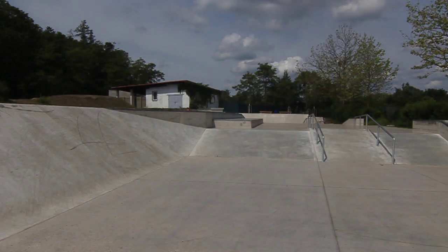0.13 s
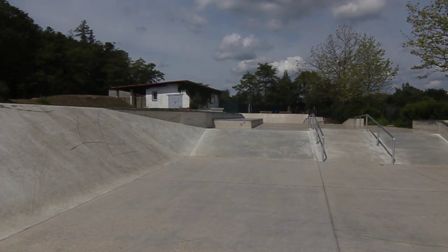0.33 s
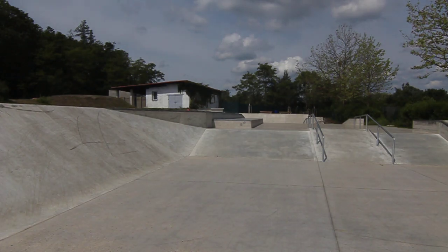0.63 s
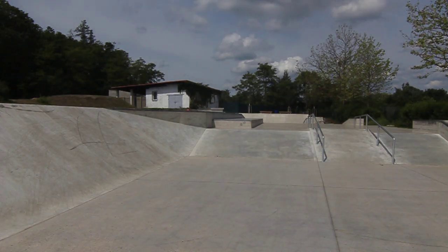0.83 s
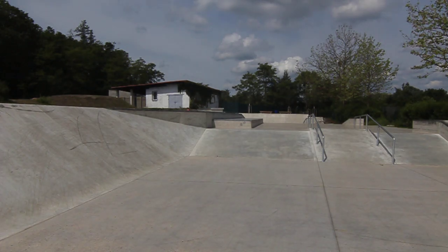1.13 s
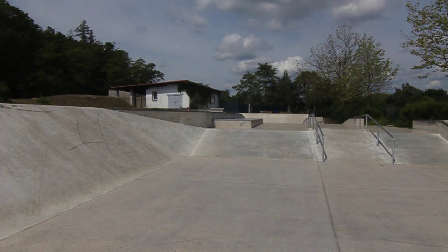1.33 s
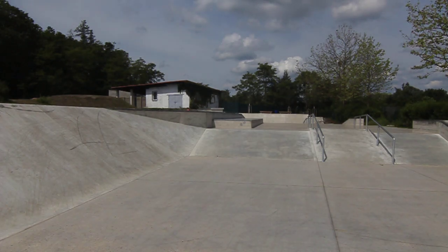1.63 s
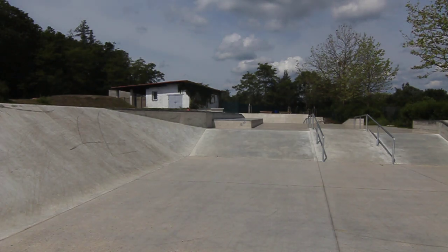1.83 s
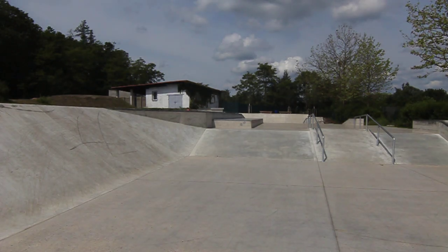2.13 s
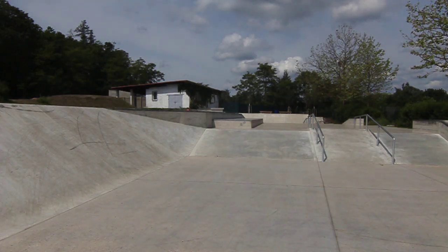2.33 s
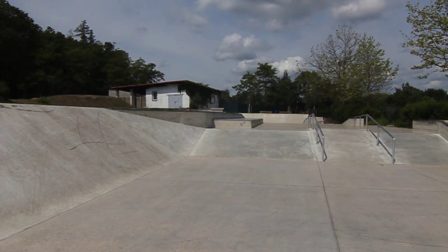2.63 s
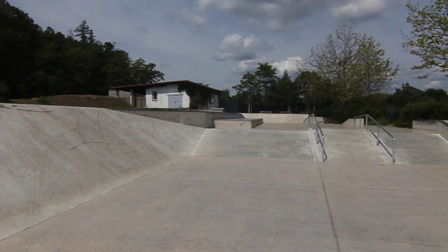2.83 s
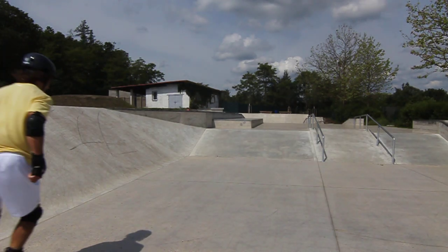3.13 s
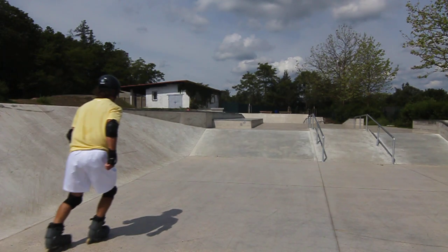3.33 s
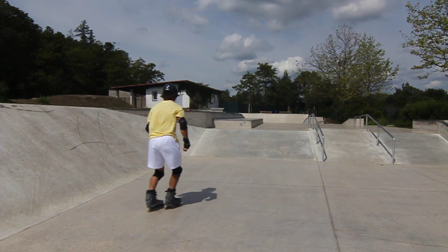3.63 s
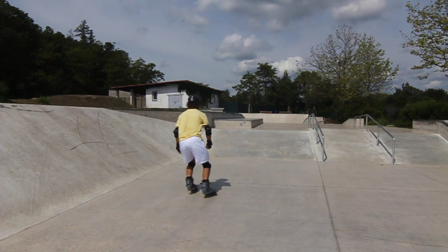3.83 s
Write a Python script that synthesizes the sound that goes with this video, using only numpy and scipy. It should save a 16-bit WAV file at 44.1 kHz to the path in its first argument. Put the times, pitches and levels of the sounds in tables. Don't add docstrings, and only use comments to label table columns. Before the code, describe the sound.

Inline skate wheels, quiet at first, hum and grind louder over open concrete, with hollow slaps, a gritty push-off scrape and plastic creaks, passing closest after three seconds near a still microphone in light wind.

```python
import sys
import numpy as np
from scipy import signal
from scipy.fft import rfft, irfft
from scipy.io import wavfile

SR = 44100
rng = np.random.default_rng(int(sys.argv[2]) if len(sys.argv) > 2 else 0)


def level_to_linear(level):
    exponent = np.asarray(level, float) / 20
    return 10 ** exponent


def wrap_up_sound(samples):
    columns = np.atleast_2d(samples).T
    tamed = np.clip(columns, -1, 1)
    steps = np.round(tamed * 32767).astype(np.int16)
    wavfile.write(sys.argv[1], SR, steps)


N = 176400
T = np.arange(N) / SR

# time in seconds, level in dB.
RUSTLE = [(0, -53.5), (.28, -59), (.45, -68), (1.2, -69), (2.0, -70), (2.9, -54), (3.15, -45), (3.4, -51.5),
          (3.56, -55.5), (4, -53)]
# frequency in Hz, level in dB per Hz.
RUSTLE_COLOUR = [(4000, -24), (7000, 0), (12000, 1.5), (16000, -3.5)]
# start in seconds, peak in dB.
RUSTLE_TICKS = [
    (.449, -36),
    (.499, -40),
    (.568, -40),
    (0.788, -40.5),
    (1.102, -46),
    (1.247, -44),
]
# time in seconds, level in dB.
WIND = [(0.0, -59.5), (2.04, -55), (4.0, -54)]
# frequency in Hz, level in dB per Hz.
WIND_COLOUR = [(15, -31), (30, -8), (50, -4), (90, 0), (200, -4), (400, -32.5)]
# centre in seconds, peak in dB, pitch in Hz, width in seconds.
GUSTS = [
    (.678, -33, 75, .010),
    (.694, -26, 95, .007),
    (1.09, -39, 80, .010),
    (2.93, -36, 60, .012),
]
# start in seconds, length in seconds, level in dB, pitch in Hz, glide in Hz.
CHIRPS = [
    (.016, 0.0024, -41, 3780, 50),
    (.088, 0.014, -39.5, 3700, 82),
    (.104, 0.024, -38.5, 3740, 150),
    (.885, .009, -46, 2650, 0),
    (1.214, 0.029, -60, 4640, -40),
    (2.072, 0.0084, -34, 3640, 0),
]

# start in seconds, peak in dB.
CREAKS = [(2.9124, -24), (2.9203, -22), (2.9275, -19.5), (2.9354, -18), (2.939, -25), (2.9453, -24),
          (2.9528, -18), (2.959, -25), (2.9668, -23), (2.9735, -23), (2.9852, -18), (2.9946, -18),
          (3.0112, -28), (3.0172, -21), (3.0298, -21), (3.0396, -16.5), (3.0546, -18), (3.0617, -20),
          (3.0834, -25), (3.1146, -19)]
# start in seconds, peak in dB.
LATE_CREAKS = [
    (3.369, -26.5),
    (3.3863, -23),
    (3.484, -29),
    (3.676, -34),
    (3.6959, -21),
    (3.7106, -22.5),
    (3.8081, -31),
    (3.9749, -22),
]
# start in seconds, gap between ticks in seconds, peak in dB.
CREAK_RUNS = [
    (3.598, .009, -36),
    (3.725, .0085, -31),
    (1.853, .0105, -37),
]
CREAK_COUNTS = (5, 5, 21)
# frequency in Hz, level in dB, time to fall 60 dB in seconds.
SHELL = [(2040, -1.5, 0.0044), (2400, 2, 0.0056), (2850, 2.5, 0.0032), (4570, 1, 0.002), (5800, 7, 0.0024),
         (7600, 1, 0.0032), (9000, 0.5, 0.0024), (12300, 0, 0.00095)]
# start in seconds, peak in dB.
RATTLES = [(1.3608, -31), (1.365, -42), (1.3838, -29), (2.172, -29), (2.3215, -38), (2.3265, -23),
           (2.3368, -24), (2.3565, -24), (2.3755, -26), (2.397, -23), (2.4005, -31), (2.4155, -22.5),
           (2.4215, -29), (2.432, -28), (2.450, -32), (2.466, -28), (3.4255, -24.5), (3.4392, -19.5),
           (3.448, -24), (3.457, -30)]
# frequency in Hz, level in dB, time to fall 60 dB in seconds.
BUCKLE = [(2310, -2, 0.0044), (3220, -1.5, 0.0051), (4840, 9.5, 0.0046), (5480, 9, 0.0021),
          (7000, 1, 0.002), (9070, -9, 0.0088), (13000, -6.5, 0.0013)]
# start in seconds, peak in dB.
SNAPS = [
    (2.481, -33),
    (3.2359, -5.5),
    (3.506, -32),
    (3.765, -30),
    (3.802, -30),
]

# time in seconds, level in dB, lower edge in Hz.
SLIDE = [(3.79, -45, 12000), (3.83, -36, 10400), (3.87, -31, 7600), (3.92, -32, 6760), (3.945, -36, 8400),
         (4.0, -47, 9000)]
# start in seconds, length in seconds, level in dB, pitch in Hz, glide in Hz.
SQUEALS = [
    (3.89, 0.023, -40, 5700, -200),
    (3.935, 0.026, -41.5, 5800, -400),
    (3.972, 0.016, -34.5, 5470, 400),
]
# time in seconds, level in dB.
SCRAPE = [(2.6, -53), (2.63, -39), (2.655, -43), (2.70, -32.5), (2.74, -37), (2.76, -35), (2.776, -33),
          (2.81, -41), (2.826, -40), (2.843, -29)]
# start in seconds, dB in the low cores, dB in the high cores.
SLIPS = [(2.6225, -25, -28), (2.634, -26, -32), (2.646, -38, -27), (2.661, -28, -24), (2.669, -29, -27),
         (2.676, -27, -20.5), (2.687, -27, -20), (2.695, -28, -19.5), (2.702, -23, -22), (2.7083, -22, -19),
         (2.72, -35, -22), (2.732, -19.5, -19), (2.738, -24.5, -23), (2.749, -30, -27), (2.767, -30, -26),
         (2.775, -23, -22.5), (2.8277, -32, -29), (2.843, -19.5, -14.5)]
# frequency in Hz, width in Hz, level in dB.
WHEEL_CORES = [(1770, 1200, 9.5), (2180, 480, 5.5), (4730, 990, 6.5), (7670, 1900, -3.5)]

# time in seconds, hum of the wheels in dB, grind under load in dB.
ROLL = [(0, -57, -59.5), (.6, -52, -59.5), (1.3, -50, -56), (1.5, -47.5, -47.5), (1.6, -47.5, -60),
        (1.82, -47.5, -53.5), (1.9, -45, -46.5), (2.4, -43.5, -43), (2.57, -43.5, -47.5), (3.0, -44, -43),
        (3.28, -41.5, -43), (3.36, -47, -51.5), (4, -45, -46)]
# frequency in Hz, level in dB per Hz.
HUM_COLOUR = [(88, -49), (150, -17), (230, 0), (728, -1.5), (1100, 4.5), (1890, -14), (3000, -14),
              (3900, -18), (6600, -120)]
# frequency in Hz, level in dB per Hz.
GRIND_COLOUR = [(900, -8), (1600, 6), (2900, -1), (4800, -2), (6300, -6), (9000, -17), (16000, -28)]

# start in seconds, thump in dB, thump in Hz, clatter in dB, clatter in seconds.
LANDINGS = [(0.931, -42, 590, -39, 0.0064), (1.103, -33, 677, -49, 0.023), (1.397, -16, 360, -15.5, 0.0092),
            (1.598, -38, 313, -32.5, 0.0015), (2.132, -20, 295, -26.5, 0.055),
            (2.183, -5, 210, -12.5, 0.0033), (2.262, -15, 151, -18.5, 0.01),
            (2.277, -19.5, 192, -26.5, 0.011), (2.787, -17, 160, -21.5, 0.012),
            (2.8432, -18, 255, -13, 0.0042), (3.18, -27, 330, -13.5, 0.0051),
            (3.219, -4.5, 197, -15.5, 0.0064), (3.2769, -10, 207, -15, 0.009),
            (3.325, -32.5, 226, -59, 0.0068)]
# frequency in Hz, level in dB per Hz.
CLATTER_COLOUR = [(70, -35), (240, 8.5), (400, 8), (1580, 3.5), (6150, -5), (8240, -13), (10700, -14.5),
                  (16000, -15)]
# start in seconds, frequency in Hz, level in dB, 60 dB fall in seconds.
FRAME_KNOCKS = [(.931, 2270, -32.5, 0.011), (1.3985, 315, -14.5, 0.053), (1.419, 320, -23, .04),
                (2.133, 1273, -18.5, 0.037), (2.149, 1860, -28.5, 0.054), (2.186, 205, -19, 0.14),
                (2.183, 742, -14.5, 0.035), (2.184, 1130, -22.5, 0.029), (2.198, 412, -19, 0.06),
                (2.2635, 780, -16.5, 0.049), (2.2632, 360, -23.5, 0.08), (2.265, 1650, -30, 0.026),
                (2.28, 1140, -29, .03), (2.667, 170, -28.5, .07), (2.845, 388, -25, 0.038),
                (3.2195, 374, -19, .04), (3.277, 410, -13, 0.03), (2.7746, 1830, -19, 0.018),
                (2.789, 1118, -24.5, 0.089), (2.8445, 3700, -15.5, 0.0075)]
# start in seconds, level in dB.
BOUNCES = [
    (1.4095, -26),
    (1.4155, -18),
    (1.4235, -27),
    (1.4305, -29),
    (1.4465, -23),
]
# frequency in Hz, level in dB, time to fall 60 dB in seconds.
LOOSE_WHEEL = [(1940, -7, .005), (2800, 6, 0.0044), (4140, 7, 0.0024), (5800, 4, 0.0033)]
# start in seconds, level in dB.
PINGS = [
    (3.2203, -14),
    (3.2263, -15),
    (3.281, -18),
]


def rms_one(x):
    return x / np.sqrt(np.mean(x ** 2) + 1e-20)


def noise():
    return rng.standard_normal(N)


def in_time(rows):
    s, *columns = np.transpose(rows)
    return [np.interp(T, s, c) for c in columns]


def drift(rate):
    r = np.exp(-80 * np.pi * rate / SR)
    slow = signal.lfilter([1], [1, -2 * r, r * r], rng.standard_normal(N // 40 + 2002))[2000:]
    return np.interp(np.arange(N) / 40, np.arange(len(slow)), rms_one(slow))


def colour(x, spectrum):
    hz, db = np.transpose(spectrum)
    f = np.maximum(np.fft.rfftfreq(N, 1 / SR), 1)
    gain = level_to_linear(np.interp(np.log(f), np.log(hz), db))
    return rms_one(irfft(rfft(x) * gain, N))


def high_pass(x, hz):
    return signal.lfilter(*signal.butter(2, hz, "high", fs=SR), x)


def band_pass(x, low_hz, high_hz):
    return signal.sosfilt(signal.butter(2, [low_hz, high_hz], "band", fs=SR, output="sos"), x)


def click_at(s, db):
    return level_to_linear(db) * (np.arange(N) == int(s * SR))


def ring(clicks, hz, t60):
    r, w = level_to_linear(-60 / (t60 * SR)), 2 * np.pi * hz / SR
    return signal.lfilter([0, np.sin(w)], [1, -2 * r * np.cos(w), r * r], clicks + 1e-18)


def grains(rate, spread_db):
    sizes = level_to_linear(spread_db * np.minimum(rng.exponential(1, N), 5)) * rng.choice([-1, 1], N)
    return sizes * (rng.random(N) < rate / SR)


def after(s, t60, rise_s):
    out = np.zeros(N)
    active = (T > s) & (T < s + t60)
    age = T[active] - s
    out[active] = (1 - np.exp(-age / rise_s)) * level_to_linear(-60 * age / t60)
    return out


def ticks(rows, modes, blur_s, gain_db):
    s, db = np.transpose(rows)
    chance = rng.normal(0, 1.2, (len(s), len(modes)))
    roughness = np.sign(noise()) if blur_s > 1e-4 else 1
    fade = np.exp(-np.arange(300) / (blur_s * SR))
    fade = fade / np.linalg.norm(fade)
    out = 0
    for k, (hz, level_db, t60) in enumerate(modes):
        clicks = np.zeros(N)
        clicks[(s * SR).astype(int)] = level_to_linear(db + level_db + chance[:, k] + gain_db)
        scratch = np.convolve(clicks, fade)[:N] * roughness
        out = out + (-1) ** k * ring(scratch, hz, t60)
    return out


def runs(rows, counts):
    out = []
    for (s, gap, db), count in zip(rows, counts):
        for k in range(count):
            out.append((s + gap * (k + rng.normal(0, .06)), db))
    return out


def whistles(rows, rough):
    out, wobble = 0, drift(180)
    for s, length, db, hz, glide_hz in rows:
        u = np.clip((T - s) / length, 0, 1)
        turns = length * (hz * u + glide_hz * u * u / 2)
        out = out + level_to_linear(db) * np.sin(np.pi * u) ** 0.25 * np.sin(2 * np.pi * turns + rough * wobble)
    return out


def wind():
    out = colour(noise(), WIND_COLOUR) * level_to_linear(in_time(WIND)[0] + 3 + 2.5 * drift(10))
    for s, db, hz, width in GUSTS:
        out += level_to_linear(db) * np.cos(2 * np.pi * hz * (T - s)) * np.exp(-((T - s) / width) ** 2)
    return out


def rustle():
    comb_hz, comb_feedback, comb_fade_s = 1465, .5, 1.3
    crisp = colour(noise() + .4 * rms_one(grains(600, spread_db=3.0)), RUSTLE_COLOUR)
    comb = np.r_[1, np.zeros(int(SR / comb_hz) - 1), -comb_feedback]
    banded = rms_one(signal.lfilter([1], comb, crisp))
    share = np.exp(-(T / comb_fade_s) ** 2)
    mixed = share * banded * level_to_linear(3.0 * drift(50)) + (1 - share) * crisp
    ticking = sum(level_to_linear(db - 5) * after(s, 0.013, rise_s=0.00046) for s, db in RUSTLE_TICKS)
    return mixed * level_to_linear(in_time(RUSTLE)[0] + .8 * drift(30)) + banded * ticking


def bird():
    return whistles(CHIRPS, rough=0.61)


def boots():
    snap_low_hz, snap_s = 5000, .003
    snaps = sum(level_to_linear(db - 3) * after(s, 4.0 * snap_s, rise_s=.0003) for s, db in SNAPS) * noise()
    creak_rows = list(CREAKS) + list(LATE_CREAKS) + runs(CREAK_RUNS, CREAK_COUNTS)
    creaks = ticks(creak_rows, SHELL, blur_s=.00005, gain_db=-7)
    rattles = ticks(RATTLES, BUCKLE, blur_s=.0018, gain_db=-8)
    return creaks + rattles + high_pass(snaps, snap_low_hz)


def slide():
    db, edge_hz = in_time(SLIDE)
    out, white = 0, rng.standard_normal((2, N))
    for k, hz in enumerate(np.arange(6000, 16000, 1000)):
        band = band_pass(white[k % 2], hz, hz + 1000)
        opening = 1 / (1 + np.exp((edge_hz - hz - 500) / 300))
        out = out + band * level_to_linear(4.1 * drift(34) - 0.88 * k) * opening
    return 1.6 * out * level_to_linear(db) * (T > SLIDE[0][0])


def squeals():
    return whistles(SQUEALS, rough=2.3)


def scrape():
    slips_per_s, slip_t60_s, slip_blur_s = 2500, 0.0043, 0.002
    grit = [rms_one(grains(slips_per_s, spread_db=2.5)) * level_to_linear(2.0 * drift(110)) for _ in range(2)]
    bed = 0
    for k, (hz, width, db) in enumerate(WHEEL_CORES):
        bed = bed + level_to_linear(db) * rms_one(ring(grit[k // 2], hz, 1.35 / width))
    bed = high_pass(bed, 1200)
    inside = (T > SCRAPE[0][0]) & (T < SCRAPE[-1][0])
    bed = bed / np.std(bed[inside]) * level_to_linear(in_time(SCRAPE)[0]) * inside
    cores = [(hz, db, slip_t60_s) for hz, width, db in WHEEL_CORES]
    high_cores = cores[2:] + [(3970, 1.5, 0.0067), (5870, 3.8, 0.0035)]
    low = ticks([(s, db) for s, db, _ in SLIPS], cores[:2], slip_blur_s, gain_db=0.5)
    high = ticks([(s, db) for s, _, db in SLIPS], high_cores, slip_blur_s, gain_db=-7.5)
    return bed + low + high


def rolling():
    core_hz, core_width_hz, core_db, pass_s = 980, 60, -1.5, 3.39
    grit_per_s, grit_spread_db, grit_share = 1500, 3.5, .4
    hum_db, grind_db = in_time(ROLL)
    passed = 1 / (1 + np.exp((pass_s - T) / 0.025))
    core = level_to_linear(core_db) * rms_one(ring(noise(), core_hz, 1.3 / core_width_hz)) * passed
    hum = (colour(noise(), HUM_COLOUR) + core) * level_to_linear(hum_db + 2 + 1.15 * drift(35))
    grit = rms_one(grains(grit_per_s * level_to_linear(3.7 * drift(38)), grit_spread_db))
    grind = colour(noise() + grit_share * grit, GRIND_COLOUR)
    return hum + grind * level_to_linear(grind_db + 2.1 * drift(71))


def landings():
    thump_t60_s, overtone, bass_cut_hz, contact_hz = 0.038, 1.98, 158, 605
    echo_db, echo_t60_s, echo_loss_db_per_s = -13, .2, 6
    thump, clatter, echo = np.zeros((3, N))
    for s, thump_db, hz, clatter_db, length in LANDINGS:
        click = click_at(s, thump_db)
        thump += ring(click, hz, thump_t60_s) + ring(click, hz * overtone, 0.38 * thump_t60_s)
        burst = after(s, 30.0 * length, rise_s=0.00086) / (1 + (np.maximum(T - s, 0) / length) ** 4)
        clatter += level_to_linear(clatter_db - 3.0) * burst
        far_db = clatter_db + echo_db + 11.5 - echo_loss_db_per_s * s
        echo += level_to_linear(far_db) * after(s, 1.14 * echo_t60_s, rise_s=0.0014)
    thump = band_pass(thump, bass_cut_hz, contact_hz)
    clatter *= colour(noise() + .6 * rms_one(grains(2000, spread_db=2.5)), CLATTER_COLOUR)
    echo *= level_to_linear(1.6 * drift(83)) * colour(noise(), CLATTER_COLOUR)
    frame = sum(ring(click_at(s, db), hz, t60) for s, hz, db, t60 in FRAME_KNOCKS)
    frame += ticks(BOUNCES, LOOSE_WHEEL, blur_s=.0012, gain_db=-3)
    pings = ticks(PINGS, [(10400, 0, .0045)], blur_s=.00002, gain_db=0)
    return thump + clatter + high_pass(frame, bass_cut_hz) + echo + pings


def scene():
    background = wind() + rustle() + bird()
    skates = boots() + slide() + squeals() + scrape() + rolling() + landings()
    return (background + skates)[None]


def band_limit(x):
    return signal.sosfilt(signal.butter(12, 16690, fs=SR, output="sos"), x)


def record(dry):
    cutoff_hz = 15900
    top_cut = signal.cheby2(12, 70, cutoff_hz + 700, fs=SR, output="sos")
    return band_limit(signal.sosfilt(top_cut, dry))


dry = scene()
out = record(dry)
wrap_up_sound(out)
```